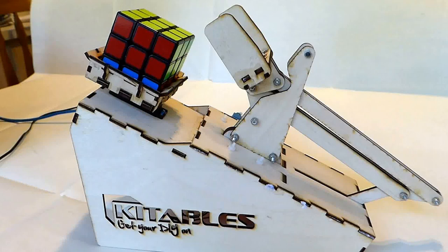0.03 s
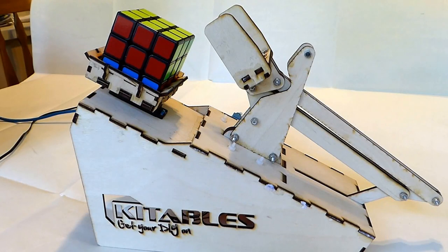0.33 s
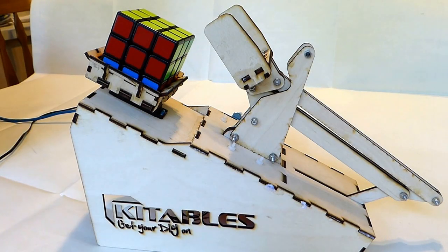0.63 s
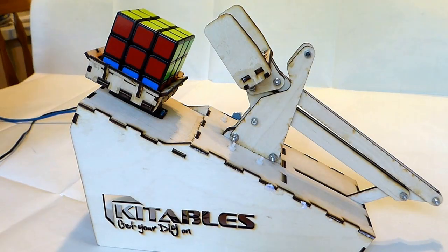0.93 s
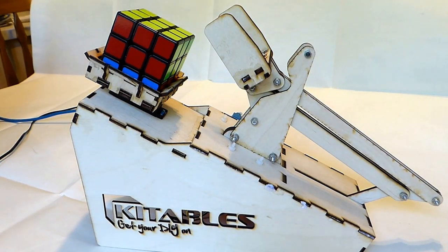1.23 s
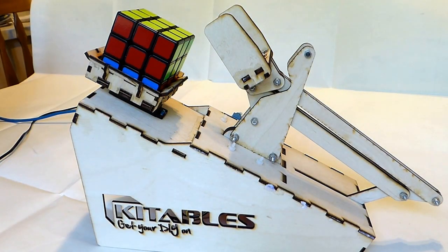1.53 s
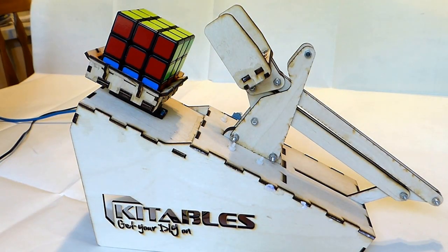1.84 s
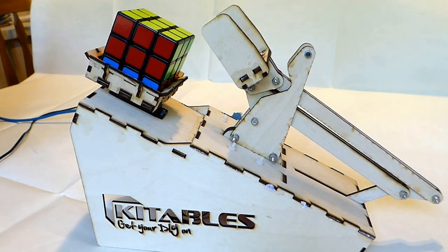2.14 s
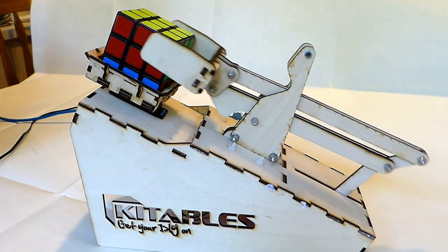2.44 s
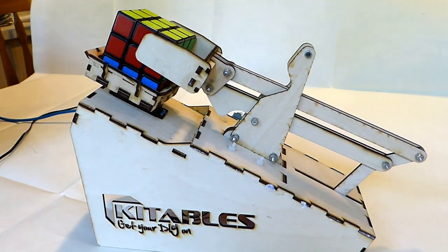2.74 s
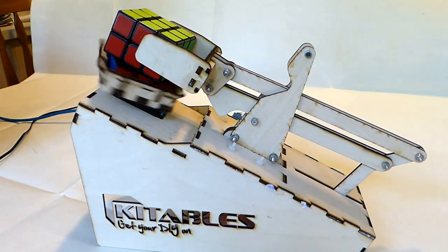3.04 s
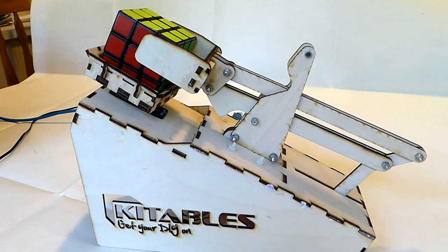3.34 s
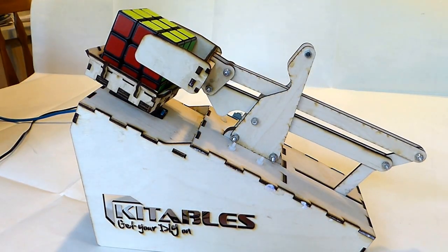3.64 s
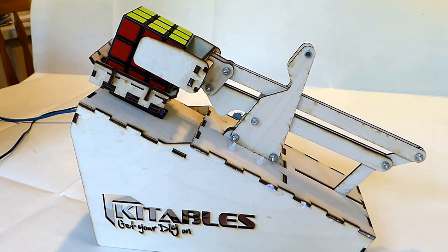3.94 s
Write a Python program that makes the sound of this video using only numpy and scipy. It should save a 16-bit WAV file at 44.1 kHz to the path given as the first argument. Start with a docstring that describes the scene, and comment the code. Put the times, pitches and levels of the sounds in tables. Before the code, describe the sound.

A small plywood machine works a puzzle cube with rasping geared motors, close to the microphone. After quiet room air with a faint fan hum come clicks, a brief arm swing, a louder gear rasp, then clacks and a knock.

```python
"""First comes the air of a quiet room with a fan humming, a faint rustle and one soft knock.
Then, close to the microphone, a small plywood machine works a puzzle cube. After a click, a servo
swings the arm over the cube, a second servo turns the cradle with a loud gear rasp, and the arm
shifts again and knocks in its loose joints. Each rasp is gear teeth striking and rattling through
the machine's body; each click and knock is a hard part ringing briefly."""
import sys
import numpy as np
from scipy import signal
from scipy.fft import rfft, irfft
from scipy.io import wavfile

SR = 44100
rng = np.random.default_rng(int(sys.argv[2]) if len(sys.argv) > 2 else 0)


def unload_audio(sound):
    """Save the sound as a 16-bit wav file, at the path given as the first command line argument."""
    columns = np.transpose(np.atleast_2d(sound))
    # keep every value between -1 and 1, then stretch to whole-number steps
    steps = np.round(np.clip(columns, -1, 1) * 32767)
    wavfile.write(sys.argv[1], SR, steps.astype(np.int16))


N = 176400
T = np.arange(N) / SR


def amp(db):
    """Decibels to gain."""
    return 10 ** (np.asarray(db) / 20)


def unit(x):
    """Scales to rms 1."""
    return x / np.sqrt(np.mean(x ** 2) + 1e-20)


def read(points, hz):
    """Reads a table on a log-frequency axis."""
    f, value = np.transpose(points)
    return np.interp(np.log(hz + 1), np.log(f + 1), value)


def level(points):
    """Gain along a level curve, silent outside it."""
    return amp(np.interp(T, *np.transpose(points), left=-200, right=-200))


def add(mix, s, sound):
    """Adds a sound at a time in seconds."""
    part = mix[round(s * SR):][:len(sound)]
    part += sound[:len(part)]


def drift(hz):
    """Random wavering of rms 1, up to a rate."""
    f = np.fft.rfftfreq(N, 1 / SR)
    return unit(irfft(rfft(rng.standard_normal(N)) / (1 + (f / hz) ** 4), N))


def colour(x, points, size=4096):
    """Causal filter of energy 1: only the shape of the spectrum counts."""
    log_gain = np.log(amp(read(points, abs(np.fft.fftfreq(size, 1 / SR)))))
    taps = np.fft.ifft(np.exp(np.conj(signal.hilbert(log_gain)))).real[:size // 2]
    return signal.oaconvolve(x, taps / np.linalg.norm(taps))[:N]


def tilted(points, db_per_octave):
    """A spectrum made brighter or duller."""
    return [(hz, db + db_per_octave * np.log2(hz / points[0][0])) for hz, db in points]


def pan(x, left_db):
    """Places a sound left or right of the microphone's centre."""
    return x * amp(np.array([[left_db], [-left_db]]) / 2)


def rattle(per_s, spread_db=1.36):
    """Random tiny impacts of uneven strength."""
    strength = amp(spread_db * np.minimum(rng.exponential(1, N), 4))
    return unit(strength * rng.choice([-1, 1], N) * (rng.random(N) < per_s / SR))


# The air around the microphone. Each row: frequency in Hz, relative level in dB.
AIR_COLOUR = [(20, -64), (50, -29), (70, -31), (115, -10), (165, -10), (205, -1.5), (280, -4), (400, -2),
              (480, -9), (600, -13), (800, -14), (1000, -16), (1250, -22), (1520, -19), (2000, -22.5),
              (2450, -31), (2800, -28), (4000, -31.5), (4800, -31), (5650, -37.5), (6400, -32),
              (8100, -37.5), (10250, -32), (11000, -36.5), (15200, -43)]
# How alike its two sides are. Each row: frequency in Hz, correlation.
AIR_LIKENESS = [(60, 0.83), (180, 0.99), (550, 0.88), (1650, -0.66), (4970, 0.25), (15000, 0.51)]
# Where it leans. Each row: frequency in Hz, left over right in dB.
AIR_LEAN = [(60, -3), (180, -1), (550, -4.5), (1650, -0.5), (4970, 0.5), (15000, -1)]


def room_air(level_db=-49.5):
    """Steady room noise, partly shared by the two sides of the microphone."""
    hz = np.fft.rfftfreq(N, 1 / SR)
    shared, separate = rfft(rng.standard_normal((2, N)))
    likeness = np.clip(read(AIR_LIKENESS, hz), -1, 1)
    lean = amp(read(AIR_LEAN, hz) / 2)
    left = shared * lean
    right = (likeness * shared + np.sqrt(1 - likeness ** 2) * separate) / lean
    spectrum = np.array([left, right]) * amp(read(AIR_COLOUR, hz))
    return amp(level_db) * unit(irfft(spectrum, N))


# The fan in the background. Each row: frequency in Hz, level in dB.
FAN_TONES = [(240, -65), (329, -60), (657, -75)]


def fan():
    """A fan hums just right of centre, each tone wavering in level and pitch."""
    hum = np.zeros(N)
    for hz, db in FAN_TONES:
        gain = amp(db) * (1 + 0.22 * drift(4))
        cycles = np.cumsum(hz + 1.86 * drift(6.15)) / SR
        hum += gain * np.sqrt(2) * np.sin(2 * np.pi * cycles)
    return pan(hum, left_db=-1.5)


# The opening rustle. Each row: time in seconds, level in dB.
RUSTLE_LEVEL = [(.33, -60), (.45, -64.5), (.485, -56), (.52, -65.5), (.8, -65.5), (1.1, -70.5), (1.5, -83)]
# Each row: frequency in Hz, relative level in dB.
RUSTLE_SPECTRUM = [(200, -8), (520, 4), (900, -3), (1700, 2.5), (3000, -4.5), (6500, -11.5), (12000, -29)]


def rustle():
    """Faint ticks on both sides blur into a rustle that settles before the machine moves."""
    return np.array([colour(rattle(per_s=4000) * level(RUSTLE_LEVEL), RUSTLE_SPECTRUM) for _ in "LR"])


# The small room's decay. Each row: frequency in Hz, seconds to fall 60 dB.
ROOM_DECAY = [(200, 0.16), (1000, 0.68), (3500, 0.48), (9000, 0.28), (15000, 0.083)]


def room(x, wet_db, early_db, early_fade_s=0.0093):
    """Direct sound reaches the microphone, then reflections off table and frame, then the room's tail."""
    t = np.arange(SR * 3 // 4) / SR
    early = rng.standard_normal((2, len(t))) * (rng.random((2, len(t))) < 1500 / SR)
    early *= np.exp(-t / early_fade_s) * (t > .001)
    diffuse = rng.standard_normal((2, len(t))) * np.minimum(t / 0.0085, 1)
    hz, at, bands = signal.stft(diffuse, SR, nperseg=256)
    decay = amp(-60 * at / read(ROOM_DECAY, hz)[:, None])
    tail = signal.istft(bands * decay, SR, nperseg=256)[1][:, :len(t)]
    tail = tail + 0.46 * tail[::-1]  # each side hears some of the other
    echo = (amp(early_db) * unit(early) + amp(wet_db) * unit(tail)) / np.sqrt(len(t))
    return x + signal.fftconvolve(x, echo, axes=1)[:, :N]


# Hiss of the arm's swing and the cradle's turn. Each row: time in seconds, level in dB.
SWING_HISS = [(2.32, -70), (2.39, -55), (2.45, -56), (2.55, -58.5), (2.64, -58.5), (2.71, -64),
              (2.76, -63.5)]
CRADLE_HISS = [(2.77, -79), (2.85, -58), (3.28, -54.5), (3.38, -57), (3.42, -67.5), (3.48, -70)]
# Each row: frequency in Hz, relative level in dB.
HISS_SPECTRUM = [(500, -18), (2500, -3), (7000, -4.5), (10500, -7), (13000, -5.5), (15000, -9)]


def motor_hiss():
    """The motors hiss thinly, dead centre."""
    return colour(rattle(per_s=6000) * (level(SWING_HISS) + level(CRADLE_HISS)), HISS_SPECTRUM)


# Friction in the arm's links. Each row: time in seconds, level in dB.
RUB_LEVEL = [(2.27, -60.5), (2.36, -47.5), (2.395, -36), (2.43, -47.5), (2.47, -37.5), (2.52, -58),
             (2.72, -74)]
# Each row: frequency in Hz, relative level in dB.
RUB_SPECTRUM = [(150, -17.5), (330, -14), (440, 8.5), (540, -8), (680, 2.5), (900, -16), (1400, -16.5),
                (4000, -63)]


def link_rub():
    """Wooden links rub in tiny catches as the arm swings, right of centre."""
    return pan(colour(rattle(per_s=900) * level(RUB_LEVEL), RUB_SPECTRUM), left_db=-3.5)


# The scuff where two parts meet. Each row: frequency in Hz, relative level in dB.
SCUFF_SPECTRUM = [(80, -47), (300, 0), (700, 2.5), (2000, 3.5), (3000, -10.5), (4700, -3.5), (7000, -21),
                  (15000, -30)]


def blows(rows, modes, scuff_db, scuff_fade_s=0.004):
    """Each blow is a ring of the part's modes, slightly detuned, and a brief scuff of contact."""
    out, t = np.zeros(N), np.arange(SR // 4) / SR
    pivot_hz = modes[1][0]
    for start, db, tilt, length in rows:
        for k, (hz, mode_db, t60) in enumerate(modes):
            ring = amp(db + mode_db + tilt * np.log2(hz / pivot_hz) - 60 * t / (t60 * length))
            detuned_hz = hz * (1 + 0.014 * rng.standard_normal())
            add(out, start, (-1) ** k * ring * np.sin(2 * np.pi * detuned_hz * t) / 2)
        scuff = amp(db + scuff_db) * np.exp(-t / scuff_fade_s) * rng.standard_normal(len(t))
        add(out, start, colour(scuff, tilted(SCUFF_SPECTRUM, tilt)))
    return out


# Small parts. Each row: start in seconds, level in dB, tilt in dB per octave, ring length factor.
PART_CLICKS = [(1.965, -49, 0, 0.47), (2.148, -32.5, -0.5, 1), (2.1502, -28.5, 1, 0.27),
               (2.16, -43, 4.5, 0.61), (2.295, -41.5, -3, .6), (2.385, -30.5, 1.5, 0.55),
               (2.463, -39, 4.5, 0.61), (2.631, -36, -6.5, .5), (2.691, -36, -5.5, .7)]
# Each row: mode frequency in Hz, relative level in dB, seconds to fall 60 dB.
PART_RING = [(605, -1.5, 0.023), (800, -2, 0.024), (1104, 3, 0.023), (1570, 1.5, 0.051), (1600, 3, 0.023),
             (2110, -7, 0.022), (2195, -16.5, 0.32), (3600, -16, .03), (4240, -7, .02), (4430, -1.5, 0.018),
             (4750, -15, .03)]


def clicks():
    """Small hard parts click lightly, a little to the right."""
    return pan(blows(PART_CLICKS, PART_RING, scuff_db=-6), left_db=-2)


# The frame. Each row: start in seconds, level in dB, tilt in dB per octave, ring length factor.
FRAME_KNOCKS = [(.472, -38.5, -1.5, 0.82), (2.386, -39, 6.5, 0.75), (2.463, -32, -10, 0.8),
                (2.822, -30, 3.5, 0.94), (3.135, -36.5, 0.5, 1), (3.7825, -27.5, 2.5, 0.92),
                (3.811, -25.5, 11, .5), (3.8172, -14.5, 0.5, .42)]
# Each row: mode frequency in Hz, relative level in dB, seconds to fall 60 dB.
FRAME_RING = [(382, -5.5, 0.1), (448, -4.5, 0.097), (574, -1, 0.055), (690, -0.5, 0.091), (777, -2, 0.054),
              (923, -11.5, 0.049), (1110, -20.5, 0.065), (2100, -21, 0.024)]


def knocks():
    """The plywood frame rings low when knocked, right of centre."""
    return pan(blows(FRAME_KNOCKS, FRAME_RING, scuff_db=-19), left_db=-3)


# The joints. Each row: start in seconds, level in dB, tilt in dB per octave, ring length factor.
JOINT_CLACKS = [(3.742, -33.5, -7, 0.73), (3.7635, -33, 0, .7), (3.779, -37.5, 6, .8), (3.842, -36, -2, 1),
                (3.864, -32, -5, 1), (3.88, -34, 10, 1), (3.902, -31.5, -4, 1)]
# Each row: mode frequency in Hz, relative level in dB, seconds to fall 60 dB.
JOINT_RING = [(1446, -5, 0.046), (1670, 2, 0.023), (2330, -4, 0.051), (3360, -8, 0.03), (3900, -7.5, .02),
              (5500, -16, 0.022)]


def clacks():
    """The arm's loose joints clack as it shifts, just left of centre."""
    return pan(blows(JOINT_CLACKS, JOINT_RING, scuff_db=-10.5), left_db=1)


# Dry snaps. Each row: start in seconds, level in dB, tilt in dB per octave.
BACKLASH_SNAPS = [(2.06, -46.5, 1), (2.385, -27, -3), (2.793, -40, -6), (2.834, -34.5, -3.5),
                  (2.859, -34, -5.5), (2.939, -29, -2), (2.964, -28, -4), (2.995, -21, -2.5),
                  (3.04, -21, 0), (3.737, -39.5, 2), (3.8098, -22.5, 3.5)]
# Each row: frequency in Hz, relative level in dB.
SNAP_SPECTRUM = [(100, -45), (700, -17), (1500, -6), (3000, 9), (6000, -5.5), (10500, -3.5), (15500, -9)]


def snaps(fade_s=0.00098):
    """Plastic and gear backlash give very short bright cracks, just left of centre."""
    out, t = np.zeros(N), np.arange(SR // 20) / SR
    for start, db, tilt in BACKLASH_SNAPS:
        crack = amp(db) * np.exp(-t / fade_s) * rng.standard_normal(len(t))
        add(out, start, colour(crack, tilted(SNAP_SPECTRUM, tilt)))
    return pan(out, left_db=1.2)


def gears(effort, body, bunching, flutter_db, tooth_hz=200.3):
    """Gear teeth strike in turn, each shaking loose a cluster of rattles that sound through the body."""
    teeth = np.cumsum(tooth_hz * (1 + 0.044 * drift(15))) / SR
    strikes = unit(np.diff(np.floor(teeth), prepend=0) * amp(1.1 * rng.standard_normal(N)))
    clusters = unit(rattle(per_s=11000) * np.exp(bunching * np.cos(2 * np.pi * teeth)))
    drive = (0.27 * strikes + clusters) * amp(flutter_db * drift(67))
    return colour(unit(drive) * level(effort), body)


def wander(x, depth_db=2, patch_hz=425, patch_s=0.0065):
    """The contact wanders, so parts of the body ring in turn: short swells and dips in narrow bands."""
    hz, at, bands = signal.stft(x, SR, nperseg=256, noverlap=192)
    across = np.fft.fftfreq(len(hz), hz[1])[:, None] * patch_hz
    along = np.fft.fftfreq(len(at), at[1]) * patch_s
    blur = np.exp(-10 * (across ** 2 + along ** 2))
    patches = np.fft.ifft2(np.fft.fft2(rng.standard_normal(bands.shape)) * blur).real
    gain = unit(amp(depth_db * unit(patches)))
    return signal.istft(bands * gain, SR, nperseg=256, noverlap=192)[1][:N]


# The servo's effort in the arm's two moves. Each row: time in seconds, level in dB.
SWING_EFFORT = [(2.2, -70), (2.29, -61.5), (2.34, -51), (2.385, -42), (2.425, -46), (2.475, -45),
                (2.51, -51), (2.56, -75), (2.7, -67), (2.76, -88)]
SHIFT_EFFORT = [(3.734, -57), (3.755, -50), (3.765, -44.5), (3.795, -43), (3.81, -42), (3.835, -42.5),
                (3.865, -40.5), (3.9, -43.5), (3.92, -54.5), (3.98, -71)]
# The body's response in each. Each row: frequency in Hz, relative level in dB.
SWING_BODY = [(200, -18), (500, 2.5), (1000, 1), (1700, -4), (2300, 1.5), (2700, 1.5), (3300, 3.5),
              (4000, -3), (5600, -2.5), (6500, -9.5), (8300, -15), (9200, -10.5), (11500, -10),
              (13000, -24), (15500, -14)]
SHIFT_BODY = [(200, -27), (450, 8), (750, -7), (1150, -23), (1620, 4.5), (1950, -5.5), (2250, 0.5),
              (2700, -3.5), (3500, -0.5), (4600, -7), (5800, -6), (8300, -11), (9150, -8.5), (11000, -12.5),
              (13000, -19), (15500, -35)]


def arm_servo():
    """Near the centre, gears swing the arm over the cube and later shift it again."""
    swing = wander(gears(SWING_EFFORT, SWING_BODY, bunching=0.073, flutter_db=0.7))
    shift = wander(gears(SHIFT_EFFORT, SHIFT_BODY, bunching=0.13, flutter_db=-1.0))
    return pan(swing, left_db=-1) + pan(shift, left_db=0.2)


# The servo's effort in the cradle's turn. Each row: time in seconds, level in dB.
CRADLE_EFFORT = [(2.77, -61), (2.81, -51), (2.828, -44), (2.86, -49), (2.91, -43), (2.95, -36), (2.99, -27),
                 (3.06, -23.5), (3.11, -24), (3.185, -26), (3.225, -35), (3.28, -55), (3.38, -66),
                 (3.44, -70)]
# The body's response. Each row: frequency in Hz, relative level in dB.
CRADLE_BODY = [(60, -39), (250, -12.5), (450, -14), (750, -11.5), (1100, -16), (1550, -3), (1900, -4.5),
               (2300, -3.5), (3200, -1), (3750, 2), (4300, -3), (5600, 0), (7500, -1.5), (8100, -6.5),
               (8700, -1), (9150, 3.5), (9600, -1), (10300, -3.5), (11700, -5.5), (13000, -14),
               (15300, -21)]
# The gear mesh follows the cradle's speed. Each row: time in seconds, pitch in Hz.
MESH_PITCH = [(2.94, 1560), (3.02, 1591), (3.075, 1879), (3.11, 1889), (3.14, 1802), (3.165, 1657.5),
              (3.25, 1640)]
# Each row: multiple of that pitch, level in dB relative to the effort.
MESH_HARMONICS = [(1, -20.5), (2, -14), (3, -21), (5, -16.5)]


def cradle_servo():
    """Straight ahead of the microphone, the cradle turns with a loud rasp and a rough mesh whine."""
    rasp = gears(CRADLE_EFFORT, CRADLE_BODY, bunching=0.11, flutter_db=1.86)
    mesh_hz = np.interp(T, *np.transpose(MESH_PITCH)) * (1 + 0.0309 * drift(333))
    cycles = np.cumsum(mesh_hz) / SR
    whine = np.zeros(N)
    for multiple, db in MESH_HARMONICS:
        roughness = unit(1 + 0.39 * drift(62))
        whine += amp(db) * np.sqrt(2) * np.sin(2 * np.pi * multiple * cycles) * roughness
    return pan(wander(rasp + whine * level(CRADLE_EFFORT)), left_db=-0.1)


def scene():
    """Three servo moves with their clicks and knocks, close up, over the room's air and fan."""
    moves = arm_servo() + cradle_servo() + motor_hiss() + link_rub()
    machine = room(moves, wet_db=-9.5, early_db=-5.5)
    machine += room(clicks(), wet_db=-7.5, early_db=-3)
    machine += room(knocks() + clacks() + snaps(), wet_db=-13, early_db=-6)
    low_cut = signal.butter(2, 115, "high", fs=SR, output="sos")  # thins the machine's bass
    return signal.sosfilt(low_cut, machine) + room_air() + fan() + rustle()


def record(dry):
    """The microphone opens after a moment of silence and passes all but the highest treble."""
    start_s, cut_hz = 0.334, 15600
    opened = dry * np.clip((T - start_s) / 0.002, 0, 1)
    low_pass = signal.firwin(401, cut_hz, window=("kaiser", 8), fs=SR)
    return signal.oaconvolve(opened, low_pass[None], "same")


dry = scene()
out = record(dry)
unload_audio(out)
```